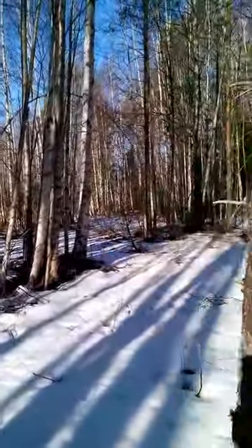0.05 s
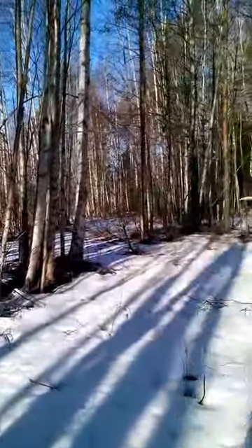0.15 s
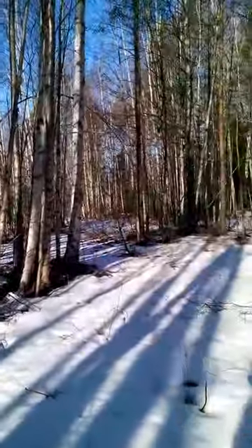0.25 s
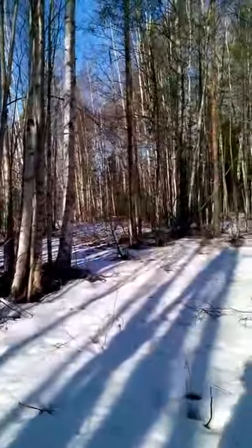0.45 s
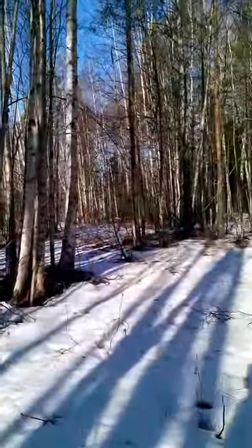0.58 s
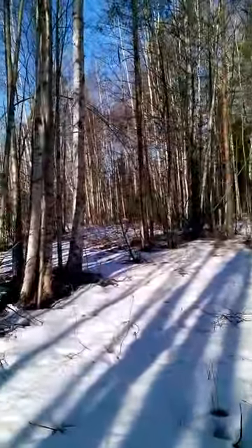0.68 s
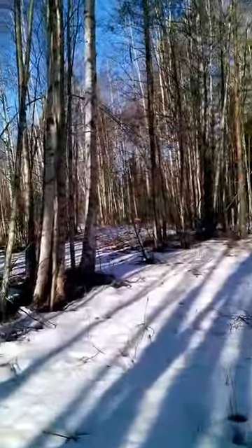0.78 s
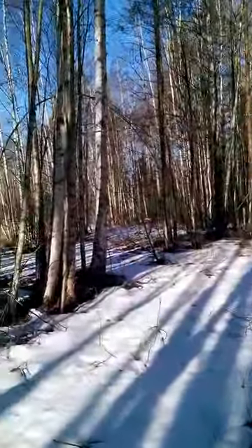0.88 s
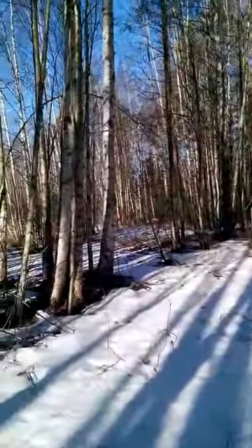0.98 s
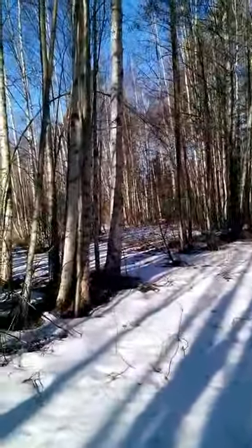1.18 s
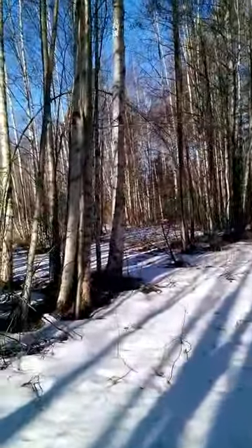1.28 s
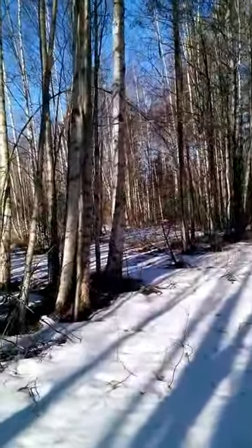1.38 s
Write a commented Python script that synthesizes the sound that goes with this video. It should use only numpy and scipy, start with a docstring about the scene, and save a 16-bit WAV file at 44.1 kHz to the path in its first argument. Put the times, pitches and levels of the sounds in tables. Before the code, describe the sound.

Boots crunch twice through icy snow crust, with faint crackling between the steps.

```python
"""Two slow footsteps on crusty snow in a quiet forest clearing, microphone just above the boots.
The crust gives in short cracks, then the first boot crushes it in a dense run of tiny fractures.
Icy crumbs tick and rustle in the pause before the second step crunches down.
As that boot lifts, thin shards tinkle, loose snow hisses off it and the sole grazes the crust."""
import sys
import numpy as np
from scipy import signal
from scipy.fft import rfft, irfft, next_fast_len
from scipy.io import wavfile

SR = 44100
rng = np.random.default_rng(int(sys.argv[2]) if len(sys.argv) > 2 else 0)


def wrap_up_sound(samples):
    """Save the sound to the file named by the first command line argument, as 16-bit audio."""
    columns = np.atleast_2d(samples).T
    # keep every value between -1 and 1, then stretch to whole-number steps
    tamed = np.clip(columns, -1, 1)
    steps = np.round(tamed * 32767).astype(np.int16)
    wavfile.write(sys.argv[1], SR, steps)


N = 63945
T = np.arange(N) / SR
BAND_EDGE_HZ = 8550

# spectrum of packing snow and thick crust: frequency_hz, gain_db
DEEP_SPECTRUM = [(40, -43), (90, -19.5), (180, 2), (290, -1), (520, -3), (800, -5), (1300, -20.5),
                 (3000, -36)]


def amp(db):
    """Decibels to gain."""
    return 10 ** (np.asarray(db) / 20)


def unit(x):
    """Scale to rms 1."""
    return x / np.sqrt(np.mean(x ** 2) + 1e-20)


def envelopes(rows):
    """One gain curve for each dB column, silent outside the rows' times."""
    times, *columns = np.transpose(rows)
    return [amp(np.interp(T, times, db, left=-120, right=-120)) for db in columns]


def fracture(spectrum, vary_db, size=2048):
    """The click of one fracture: the given spectrum with random resonances of its own."""
    hz = np.fft.rfftfreq(size, 1 / SR)
    points_hz, points_db = np.transpose(spectrum)
    colour_db = np.interp(np.log(hz + 1), np.log(points_hz), points_db)
    resonances = np.interp(np.sqrt(hz / BAND_EDGE_HZ), np.linspace(0, 1, 36), rng.standard_normal(36))
    rolloff = 1 / np.sqrt(1 + (hz / BAND_EDGE_HZ) ** 16)
    cepstrum = irfft(np.log(rolloff * amp(colour_db + vary_db * resonances)))
    cepstrum[1:size // 2] *= 2  # minimum phase: the click starts sharply
    cepstrum[size // 2 + 1:] = 0
    return irfft(np.exp(rfft(cepstrum)))


def grains(spectrum, per_s, spread_db, vary_db, even_s, colours=10):
    """Random fractures of many sizes and colours, their level evened out over even_s."""
    out = np.zeros(N)
    for _ in range(colours):
        sizes = amp(spread_db * np.clip(rng.standard_normal(N), -2, 2))
        signs = np.sign(rng.standard_normal(N))
        breaks = rng.random(N) < per_s / colours / SR
        out += signal.fftconvolve(sizes * signs * breaks, fracture(spectrum, vary_db))[:N]
    window = signal.windows.hann(int(2 * even_s * SR) + 3)
    power = signal.fftconvolve(unit(out) ** 2, window / window.sum(), 'same')
    return unit(out / np.sqrt(np.abs(power) + 0.012))


def step(effort, spectrum, lands_s, glaze_wear_s=0.08, weight_rise_s=0.11):
    """A boot breaks the icy glaze, crushes the snow to a fizz and packs it as the weight comes on."""
    # spectra of fine crystals and of the icy top layer: frequency_hz, gain_db
    fizz_spectrum = [(800, -34), (2000, -2), (3000, 2.5), (4500, 1.5), (6000, 1), (7500, -0.5), (8400, -22)]
    glaze_spectrum = [(600, -26), (1400, -10), (2100, 6), (2800, -9.5), (4500, -33)]
    coarse, fine = envelopes(effort)
    age = np.maximum(T - lands_s, 0)
    crunch = grains(spectrum, per_s=3000, spread_db=4, vary_db=4.5, even_s=0.016)
    fizz = grains(fizz_spectrum, per_s=3600, spread_db=2, vary_db=3, even_s=0.014)
    intact = (age > 0) * amp(1.5) * np.exp(-age / glaze_wear_s)
    glaze = intact * grains(glaze_spectrum, per_s=1800, spread_db=6.5, vary_db=0.5, even_s=0.027)
    weight = amp(-7) * (1 - np.exp(-age / weight_rise_s))
    packing = weight * grains(DEEP_SPECTRUM, per_s=1500, spread_db=5, vary_db=1.5, even_s=0.0092)
    return coarse * (crunch + glaze + packing) + fine * fizz


def footsteps():
    """Two boots come down in turn under the microphone, each with a crunch of its own colour."""
    # each boot crushing the snow: time_s, crunch_db, fizz_db
    first_effort = [(.16, -64, -70), (.2, -52, -59.5), (.302, -54, -57.5), (.322, -43, -50),
                    (.335, -37, -43.5), (.349, -42, -46), (.365, -33, -50), (.374, -42.5, -47),
                    (.404, -31.5, -46), (.42, -34, -43.5), (.445, -41.5, -45.5), (.465, -44, -54.5),
                    (.482, -67, -59)]
    second_effort = [(.845, -53, -72), (.852, -43, -50.5), (.875, -38, -47.5), (.888, -45, -46.5),
                     (.906, -35.5, -47.5), (.922, -32.5, -41), (.942, -33.5, -42), (.968, -36.5, -43.5),
                     (1.0, -33.5, -42), (1.037, -35, -42), (1.052, -36, -35.5), (1.072, -35.5, -45),
                     (1.095, -36, -42.5), (1.135, -44, -48), (1.172, -44.5, -47), (1.198, -41, -43),
                     (1.222, -54, -52.5), (1.275, -70, -64.5)]
    # spectrum of each crunch: frequency_hz, gain_db
    first_crunch = [(40, -45.5), (95, -16.5), (190, -8), (400, 0), (740, -4), (920, -9.5), (1450, -1.5),
                    (2100, -12), (3000, -19.5), (6000, -54)]
    second_crunch = [(40, -46), (95, -16), (165, -4), (280, -7), (480, 0.5), (700, -5.5), (900, 0),
                     (1350, 0), (1700, -10.5), (2150, -8), (3000, -17), (6000, -48.5)]
    first = step(first_effort, first_crunch, lands_s=0.325)
    second = step(second_effort, second_crunch, lands_s=0.847)
    return first + second


def cracks(rise_s=0.0004, fall_s=0.0036, sag_db=1.5):
    """Each crack is a quick run of fractures that starts sharply; thick crust adds a deep part."""
    # the crust giving way: start_s, bright_gain_db, hold_s, deep_gain_db
    breaks = [(.020, -41, 0.0078, -51.5), (.0287, -42.5, 0.0062, -55.5), (.038, -46.5, 0.0035, -55),
              (0.087, -43.5, 0.0033, -61), (.095, -42, .015, -50.5), (.110, -45.5, 0.016, -50.5),
              (.147, -51, 0.015, -52.5), (.180, -37, 0.0078, -44.5), (.193, -46, .0068, -58),
              (0.2098, -35, 0.0063, -39.5), (0.23, -43.5, 0.0094, -46.5), (0.25, -39.5, 0.0032, -50),
              (0.255, -38.5, 0.0053, -35.5), (0.281, -39, .008, -35.5), (0.304, -36, 0.0056, -42),
              (0.33, -33, 0.016, -38.5), (0.3538, -29, .0095, -30), (0.368, -34, 0.0045, -34),
              (.376, -33, 0.0067, -35.5), (0.388, -33.5, .003, -31), (.396, -30, .007, -39.5),
              (0.61, -54.5, .01, -58), (.697, -46.5, 0.018, -60), (0.719, -48.5, .0042, -54.5),
              (0.817, -55, .0052, -70), (0.845, -38.5, 0.0095, -46), (.914, -34.5, .013, -44),
              (0.987, -34.5, .003, -46), (1.0422, -27.5, 0.0093, -27), (1.1127, -35, 0.0027, -43),
              (1.149, -35.5, .0099, -42), (1.191, -38, .007, -42.5), (1.219, -45.5, .005, -61),
              (1.431, -46, .04, -81)]
    # spectrum of the bright part: frequency_hz, gain_db
    spectrum = [(40, -46.5), (90, -17.5), (180, 0.5), (400, -3.5), (800, 2), (1100, -4), (1550, 2),
                (2300, -6), (3200, -10.5), (5500, -11.5), (7600, -26.5)]
    bright, deep = np.zeros(N), np.zeros(N)
    for start_s, bright_gain_db, hold_s, deep_gain_db in breaks:
        age = T - start_s
        rise = np.clip(age / rise_s, 0, 1)
        fall = np.exp(-np.maximum(age - hold_s, 0) / fall_s)
        sag = amp(-sag_db * (np.clip(age / hold_s, 0, 1) + 1.5))
        shape = rise * fall * sag
        bright += amp(bright_gain_db) * shape
        deep += amp(deep_gain_db) * shape
    bright *= grains(spectrum, per_s=4500, spread_db=3.5, vary_db=3, even_s=0.0016)
    deep *= grains(DEEP_SPECTRUM, per_s=2200, spread_db=1, vary_db=2, even_s=0.0071)
    return bright + deep


def ticks(snap_s=0.001, spectrum_peak_hz=1400):
    """Small plates of ice give way in a swell of tiny splinters with a brief hollow ring."""
    # single plates snapping: start_s, level_db, ring_hz
    snaps = [(0.011, -55.5, 1420), (.023, -56, 1180), (.029, -49, 1410), (.066, -49, 1100),
             (.1187, -51, 1580), (.21, -42, 1160), (0.2566, -41, 1000), (.305, -46, 1450),
             (.3963, -30, 1440), (0.4566, -39.5, 1590), (0.5027, -53, 1660), (0.523, -55, 1460),
             (.56, -53.5, 1350), (.589, -48, 1320), (0.6097, -50, 1480), (.6637, -49.5, 1500),
             (.835, -55, 1410), (.917, -33.5, 1304), (0.99, -37.5, 1146), (1.0417, -35.5, 1000),
             (1.2032, -45, 1190), (1.256, -55, 1220), (1.369, -57.5, 1090)]
    # spectrum of a plate, shifted to each snap's ring: frequency_hz, gain_db
    spectrum = [(60, -40), (200, -17), (600, -9), (1030, -3), (1400, 0), (1780, -3), (2500, -15),
                (6000, -20), (8000, -29)]
    out = np.zeros(N + SR)
    progress = T[:SR // 50] / snap_s
    for start_s, level_db, ring_hz in snaps:
        splinters = np.sqrt(progress) * np.exp(-progress) * rng.standard_normal(len(progress))
        plate = [(hz * ring_hz / spectrum_peak_hz, db) for hz, db in spectrum]
        click = signal.fftconvolve(splinters, fracture(plate, vary_db=1))[:SR // 100]
        out[round(start_s * SR):][:len(click)] += amp(level_db) * unit(click)
    return out[:N]


def shards(rise_s=0.00047, t60_s=0.017):
    """Thin shards land on the crust and ring for a moment."""
    # shards landing: start_s, pitch_hz, gain_db
    landings = [(.790, 2200, -52), (1.279, 3500, -51), (1.294, 2720, -44.5), (1.302, 2910, -44)]
    out = np.zeros(N)
    for start_s, pitch_hz, gain_db in landings:
        age = np.maximum(T - start_s, 0)
        shape = amp(gain_db - 60 * age / t60_s) * (1 - np.exp(-age / rise_s))
        out += shape * np.sin(2 * np.pi * pitch_hz * age)
    return out


def crumbs():
    """Icy crumbs shift under the standing boot with a faint crackle."""
    # course of the crackle: time_s, level_db
    shifting = [(0, -57), (.055, -57.5), (.14, -51.5), (.17, -56), (.47, -53.5), (.54, -57.5), (.57, -54.5),
                (.655, -55.5), (.685, -60), (.72, -54.5), (.755, -63.5), (.81, -70), (.845, -55.5)]
    # spectrum of a crumb: frequency_hz, gain_db
    spectrum = [(40, -30), (170, -16), (350, -9.5), (700, -6.5), (1000, -8.5), (1450, -1.5), (2100, -7),
                (3200, -12.5), (4800, -11), (7500, -19)]
    return envelopes(shifting)[0] * grains(spectrum, per_s=3000, spread_db=2, vary_db=4, even_s=0.075)


def loose_snow():
    """Fine crystals slide off the lifted boot and over the crust with a soft hiss."""
    # course of the slide: time_s, level_db
    slide = [(1.19, -67), (1.27, -56.5), (1.31, -55.5), (1.37, -55), (1.445, -53)]
    # spectrum of the crystals: frequency_hz, gain_db
    spectrum = [(40, -23), (190, -4), (380, -6.5), (1000, -2), (1600, -3.5), (3000, -8), (4500, -6.5),
                (6600, -2.5), (8000, -16.5)]
    return envelopes(slide)[0] * grains(spectrum, per_s=8300, spread_db=5, vary_db=2, even_s=0.058)


def scrape():
    """The lifted boot grazes the crust, which rings faintly."""
    # the sole rubbing: time_s, level_db
    graze = [(1.305, -65), (1.33, -59), (1.445, -61)]
    # hollow resonances of the crust: centre_hz, width_hz, gain_db
    modes = [(636, 45, 0), (990, 110, -5)]
    rub = rng.standard_normal(N)
    ring = np.zeros(N)
    for centre_hz, width_hz, gain_db in modes:
        resonator = signal.iirpeak(centre_hz, centre_hz / width_hz, SR)
        ring += amp(gain_db) * unit(signal.lfilter(*resonator, rub))
    return envelopes(graze)[0] * unit(ring)


def forest_air(level_db=-66):
    """Still air among the trees, a low steady hush all around the microphone."""
    # spectrum of the hush: frequency_hz, gain_db
    spectrum = [(25, -1.5), (60, -2), (170, 5.5), (400, 0), (1500, -10), (3000, -13), (8000, -11)]
    hush = signal.fftconvolve(rng.standard_normal(N), fracture(spectrum, vary_db=4))[:N]
    return amp(level_db) * unit(hush)


def scene():
    """One microphone, everything close and dry: snow gives no echo."""
    underfoot = footsteps() + cracks() + ticks() + shards() + crumbs() + loose_snow() + scrape()
    return (underfoot + forest_air())[None]


def record(dry, low_cut_hz=109, high_cut_hz=7900):
    """The recorder thins the deep bass and rolls off steeply at its band limit."""
    thinned = signal.sosfilt(signal.butter(2, low_cut_hz, 'highpass', fs=SR, output='sos'), dry)
    size = next_fast_len(N + 8192)
    hz = np.fft.rfftfreq(size, 1 / SR)
    rolloff = (hz < BAND_EDGE_HZ) / np.sqrt(1 + (hz / high_cut_hz) ** 60)
    return irfft(rfft(thinned, size) * rolloff, size)[:, :N]


dry = scene()
out = record(dry)
wrap_up_sound(out)
```